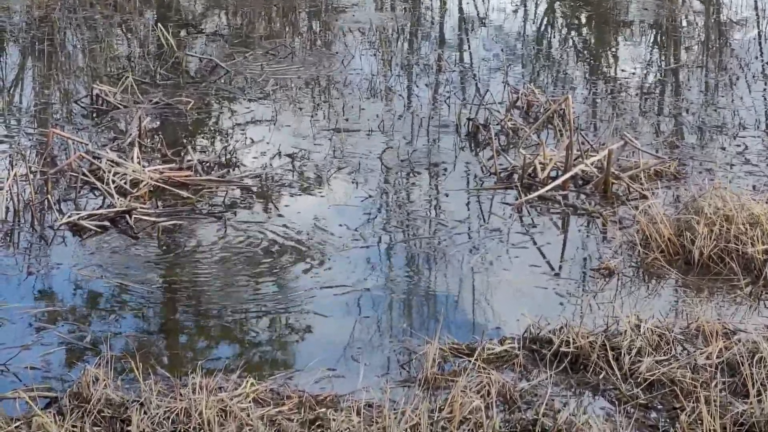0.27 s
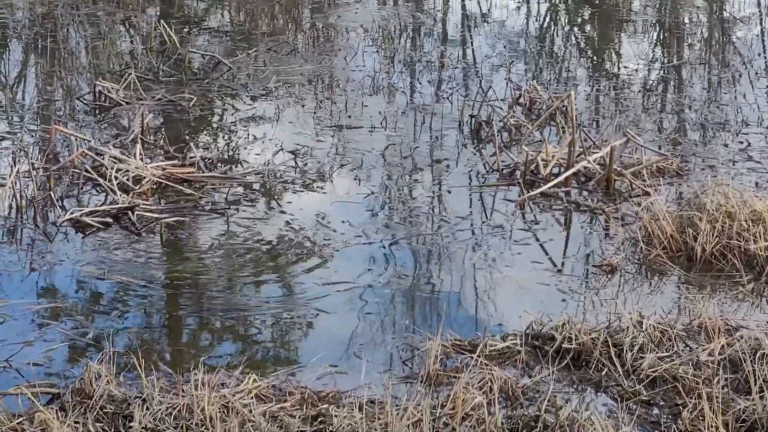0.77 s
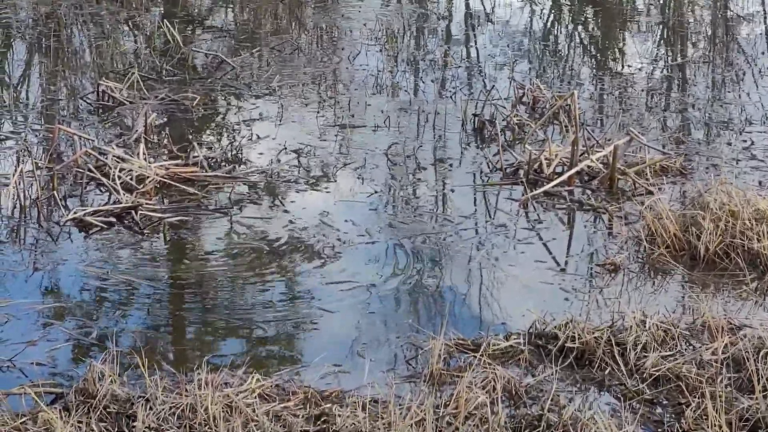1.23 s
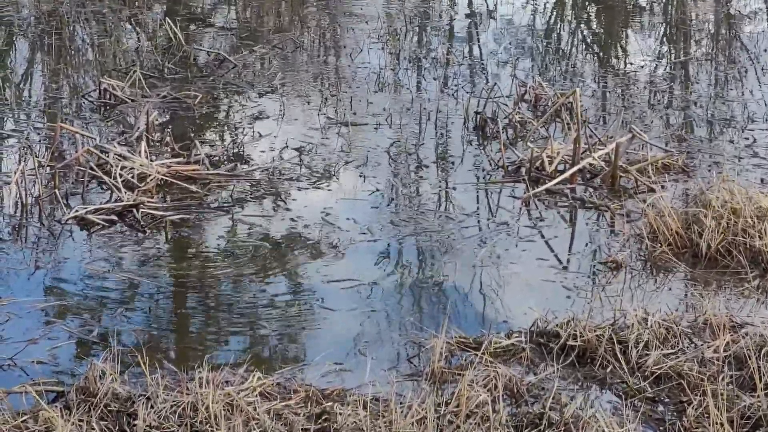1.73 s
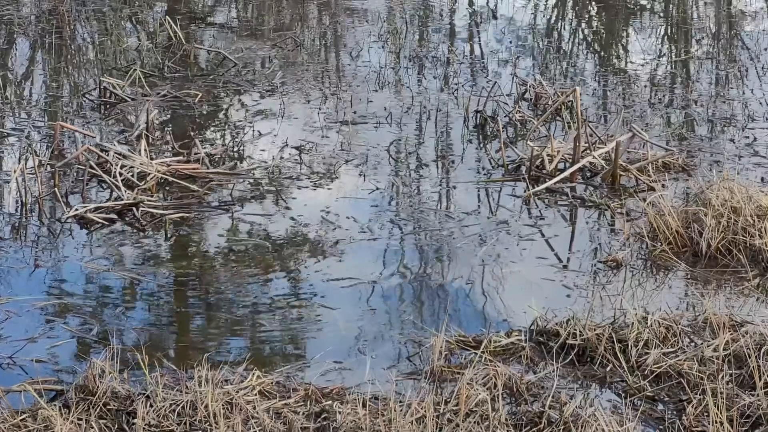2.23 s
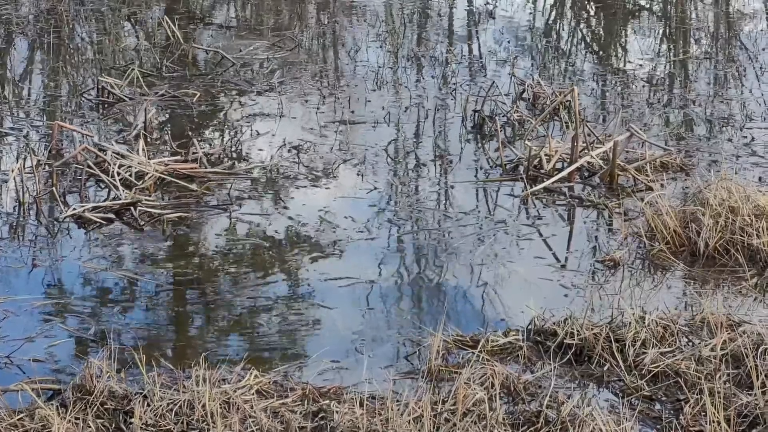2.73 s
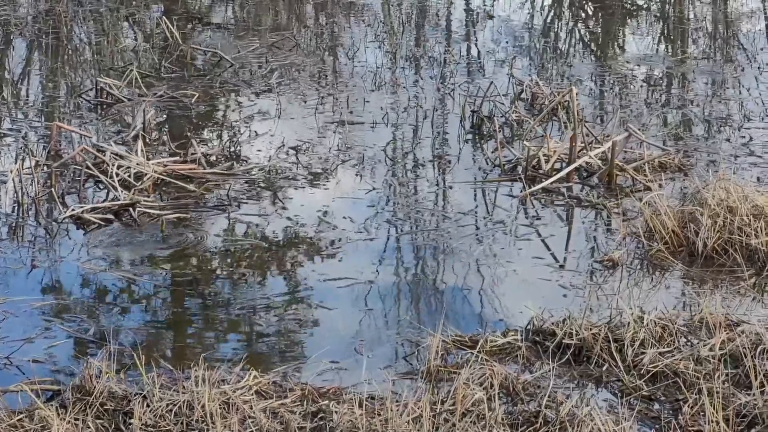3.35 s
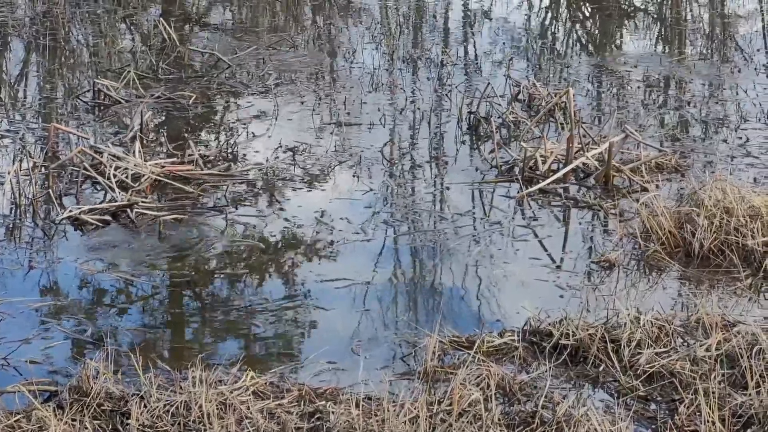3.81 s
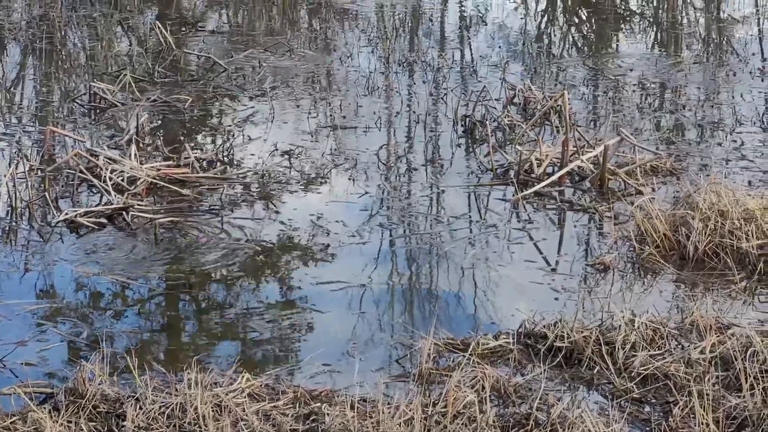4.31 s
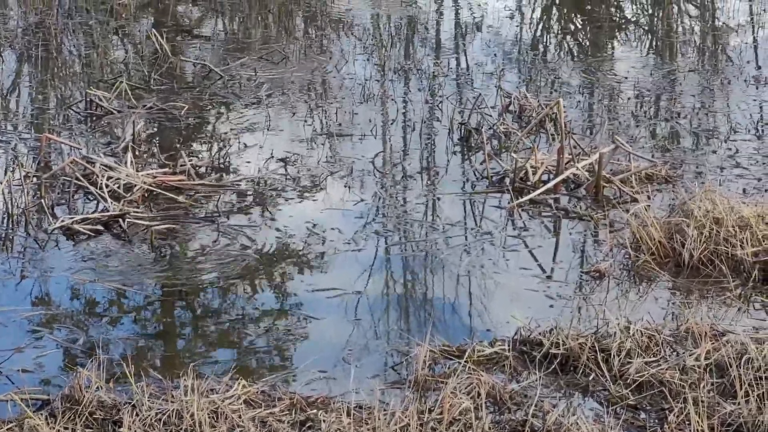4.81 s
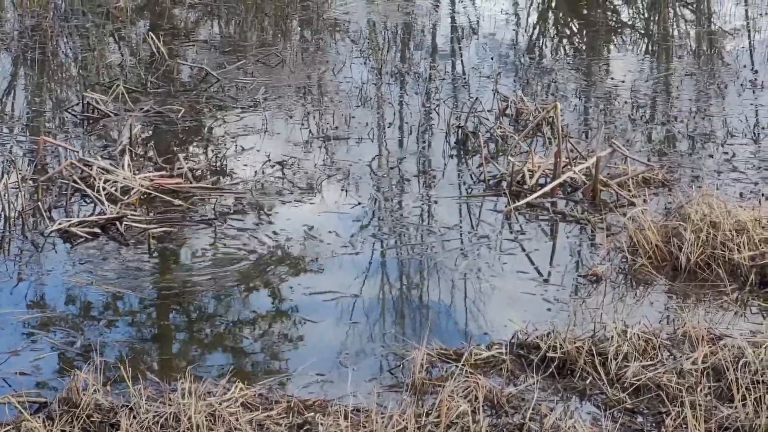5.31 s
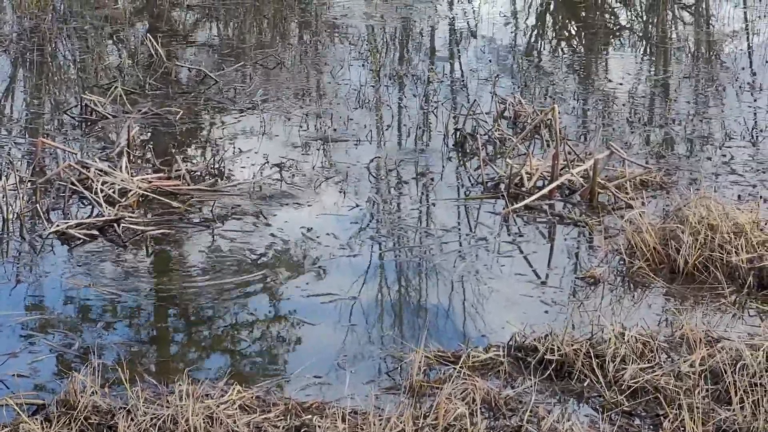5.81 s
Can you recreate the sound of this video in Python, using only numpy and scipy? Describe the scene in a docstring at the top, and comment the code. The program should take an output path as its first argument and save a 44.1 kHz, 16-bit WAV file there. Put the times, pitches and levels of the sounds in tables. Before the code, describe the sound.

About six seconds of a frog chorus on a woodland pond, heard in stereo from the bank. From the start, near frogs cluck in short, hollow, throaty bursts around 1.5 kHz, each a few hundredths of a second long, singly or in quick twos and threes that step up in pitch and usually loudness. Many farther frogs blend into a continuous blurred chatter. A distant engine hums near 215 Hz over low rumble, wavering, strongest around 0.6 to 0.9 s, and sinking slightly in pitch by 4 s. Clucks come irregularly through 3 s, then crowd together and grow louder from 3.1 to 4.2 s, with the far chorus swelling near 3.8 s. Near calls almost stop from about 4.5 to 4.85 s. A faint dry, ticking rustle, slightly left, rises between 4 and 5 s. Clucking then resumes busily to the end, with faint stirring air and soft echo from the trees.

```python
"""Frogs cluck in chorus on a woodland pond, heard from the bank by a camera with two microphone ports.
Each cluck is a short burst of throat pulses that rings the vocal sac, body and throat.
Many more frogs chatter farther out, made of overlapping clucks blurred together with noise.
A distant engine, built from sine waves, hums over a low noise rumble, with faint stirring air.
Something dry rustles faintly near the camera: hissing noise with tiny ticks in it."""
import sys
import numpy as np
from scipy import signal
from scipy.fft import rfft, irfft, next_fast_len
from scipy.io import wavfile
from scipy.ndimage import map_coordinates

SR = 44100
rng = np.random.default_rng(int(sys.argv[2]) if len(sys.argv) > 2 else 0)


def pcm_store(signal):
    """Save signal as 16-bit PCM."""
    levels = np.round(np.clip(np.atleast_2d(signal), -1, 1) * 32767)
    wavfile.write(sys.argv[1], SR, levels.astype(np.int16).T)


N = 267687  # length in samples

# Average sizes of the throat pulses in one cluck; three weak, slow ones run up to it.
# Each entry: size in dB.
PULSES = [-21, -16, -9, -2.5, -.5, 0, -.5, -2, -4.5, -9]


def amp(db):
    """Turn decibels into a gain."""
    return 10 ** (np.asarray(db) / 20)


def unit(x):
    """Scale a sound to rms 1."""
    return x / np.sqrt(np.mean(x ** 2) + 1e-20)


def along(points, hz):
    """Read a curve of (Hz, value) points on a log frequency axis."""
    f, v = np.transpose(points)
    return np.interp(np.log(hz + 1), np.log(f + 1), v)


def curves(rows):
    """Draw each column after the time as a curve with one value per sample."""
    s, *columns = np.transpose(rows)
    t = np.arange(N) / SR
    return [np.interp(t, s, column) for column in columns]


def wobble(rate):
    """Draw a smooth random curve with rate random points a second."""
    knots = rng.standard_normal(int(N * rate / SR) + 4)
    return map_coordinates(knots, [np.arange(N) * rate / SR])


def filtered(x, response):
    """Filter x with a response that is a function of frequency."""
    size = next_fast_len(N + SR // 2)
    f = np.fft.rfftfreq(size, 1 / SR)
    return irfft(rfft(x, size) * response(f), size)[..., :N]


def coloured(x, spectrum):
    """Shape x with a curve of (Hz, dB) points, then scale it to rms 1."""
    return unit(filtered(x, lambda f: amp(along(spectrum, f))))


def noise(alike):
    """Make white noise for two ports; alike is the share of power they have in common."""
    share = np.clip(alike, 0, 1)
    common = np.sqrt(share) * rng.standard_normal(N)
    return common + np.sqrt(1 - share) * rng.standard_normal((2, N))


def resonance(f, hz, width_hz):
    """Frequency response of one damped mode, something that rings at hz and dies away."""
    return 1j * f * width_hz / (hz * hz - f * f + 1j * f * width_hz)


def band(f, low_hz, high_hz, order):
    """Frequency response of a causal band filter with steep sides."""
    return signal.freqs(*signal.butter(order, [low_hz, high_hz], "band", analog=True), f)[1]


def tail(t60, size):
    """Scattered sound of energy 1 at each port: noise that loses 60 dB in t60 seconds."""
    t = np.arange(size) / SR
    soft_start = 1 - np.exp(-t / 0.0055)
    x = rng.standard_normal((2, size)) * amp(-60 * t / t60) * soft_start
    return x / np.linalg.norm(x, axis=1, keepdims=True)


def add(track, s, sound):
    """Mix a sound into the track at s seconds, cutting off what lies outside."""
    start = round(s * SR)
    part = sound[:, max(0, -start):max(0, N - start)]
    first = max(0, start)
    track[:, first:first + part.shape[1]] += part


def breeze():
    """Air stirs at each port on its own: separate low noises with a wandering level."""
    spectrum = [(18, -16), (30, -3), (40, -8), (60, -6), (120, -18), (250, -44), (600, -94.5)]  # (Hz, dB)
    stir = coloured(noise(alike=0), spectrum)
    return amp(-63 + 3 * wobble(3)) * stir


def engine():
    """A distant engine's orders (multiples of shaft rate) waver in the air over a broad rumble."""
    # Engine speed. Each row: time in seconds, pitch of the strong sixth order in Hz.
    engine_pitch = [(0.0, 218.8), (2.13, 218.6), (2.18, 217.8), (4.11, 214.9), (6.07, 214.7)]
    # The hum swells and fades on its way through the air.
    # Each row: time in seconds, level in dB before the gains below.
    hum_levels = [(0.03, -48), (0.45, -47), (0.56, -42), (0.93, -44), (1.15, -53), (1.4, -47), (1.52, -53),
                  (2.14, -49), (2.81, -52), (2.94, -58), (3.18, -51), (3.78, -57), (3.96, -46), (4.11, -46),
                  (4.53, -55), (4.87, -50), (5.65, -55), (6.04, -49)]
    # Weaker orders. Each row: multiple of the shaft rate, level in dB against the sixth order's average.
    overtones = [(2, -11), (3, -15), (7, -20.5), (8, -24), (9, -15), (12, -18)]
    # Loudness of the rumble. Each row: time in seconds, level in dB before the gains below.
    rumble_levels = [(0, -47), (.3, -50), (.4, -46.5), (.84, -44.5), (.95, -49), (1.6, -50.5), (2.05, -47),
                     (2.7, -48), (2.87, -53), (3.1, -47.5), (3.55, -50), (4, -46), (4.35, -49.5),
                     (5.05, -48.5), (5.55, -52), (6.07, -48)]
    # Tone of the rumble. Each row: frequency in Hz, relative strength in dB per Hz.
    rumble_spectrum = [(20, -29), (32, -17), (45, 1.5), (75, 0.5), (110, 0), (150, -5), (190, -11.5),
                       (245, -3.5), (290, -8.5), (360, -29), (500, -16), (900, -62)]

    (hz,), (db,), (rumble_db,) = curves(engine_pitch), curves(hum_levels), curves(rumble_levels)
    phase = 2 * np.pi * np.cumsum(hz) / SR
    shaft = phase / 6
    hum = amp(db + 0.3 * wobble(9)) * np.sin(phase)
    for multiple, level_db in overtones:
        loudness = amp(np.mean(db) + level_db + 0.67 * wobble(1.6))
        hum = hum + loudness * np.sin(multiple * shaft + .5 * wobble(10))
    rumble = amp(rumble_db + .4 + .9 * wobble(10)) * coloured(noise(alike=0.84), rumble_spectrum)
    # slightly stronger on the left
    return (amp(2.9) * hum + rumble) * amp([[.35], [-.35]])


def rustle(ticks_db=-7):
    """A soft dry hiss with tiny random ticks in it, stronger on the left."""
    # Loudness of the rustle. Each row: time in seconds, level in dB before the gains below.
    rustle_levels = [(0.05, -90), (2.45, -88), (2.73, -78), (2.85, -88), (3.79, -88), (4.09, -75),
                     (4.14, -78), (4.34, -73), (4.52, -79), (4.72, -69), (4.81, -77), (4.97, -66),
                     (5.17, -86), (5.22, -78), (5.42, -86), (5.5, -79), (5.55, -86), (6.0, -86)]
    # Tone of the rustle. Each row: frequency in Hz, relative strength in dB per Hz.
    dry_spectrum = [(1500, -44), (3500, -7), (5000, -7.5), (7000, -3.5), (8400, 1), (9300, -2.5),
                    (11000, 2), (12500, -4), (15500, 0)]

    level_db, = curves(rustle_levels)
    # about 60 ticks a second
    ticks = (rng.random(N) < 60 / SR) * rng.laplace(size=(2, N))
    grain = unit(noise(alike=.12)) + amp(ticks_db) * unit(ticks)
    loudness = amp(level_db + 5 + .8 * wobble(14))
    return loudness * coloured(grain, dry_spectrum) * amp([[1.7], [-2.1]])


def burst(f, sac_hz, lead, pulse_hz=360, spread=0.12, jitter=0.05, size_spread_db=2.85):
    """Spectra of one cluck's pulses, a row each; their spacing is a whole number of sac cycles."""
    # places counted in pulse periods; the three early pulses are farther apart
    place = np.append([-5.5, -3.6, -1.8], np.arange(len(PULSES) - 3))
    rate_hz = pulse_hz * np.exp(spread * rng.standard_normal())
    period = np.round(sac_hz / rate_hz) / sac_hz
    times = lead + (place + jitter * rng.standard_normal(len(place))) * period
    sizes = amp(PULSES + size_spread_db * rng.standard_normal(len(place)))
    # a delay turns the phase in step with frequency
    return sizes[:, None] * np.exp(-2j * np.pi * f * times[:, None])


def far_frogs(count=240, size=4096, range_db=6):
    """Overlapping distant clucks, dulled and blurred into a steady chatter with noise in it."""
    # Loudness of the far chorus. Each row: time in seconds, level in dB before a small cut below.
    chorus_levels = [(0, -49), (.73, -47), (1.59, -49.5), (2.47, -48), (2.7, -49.5), (3.35, -46),
                     (3.77, -43.5), (4.05, -46.5), (4.65, -49), (5.11, -47.5), (6.07, -46)]
    # Tone of the far chorus. Each row: frequency in Hz, relative strength in dB per Hz.
    far_spectrum = [(250, -28.5), (400, -12.5), (520, -1.5), (620, 2), (800, 1), (1100, -2), (1500, -10.5),
                    (1800, -16), (2100, -30), (3100, -42.5), (4000, -45.5), (5100, -47.5), (6500, -57)]

    out, f = np.zeros((2, N)), np.fft.rfftfreq(size, 1 / SR)
    lead = .03  # room in seconds for the early pulses
    side = np.array([[1], [-1]])
    for when, pitch, place, loud in rng.random((count, 4)):
        # a sound from one side reaches that port sooner
        ports = np.exp(2j * np.pi * f * side * (place - .5) * 0.00025)
        pulses = burst(f, 1200 + 480 * pitch, lead).sum(axis=0)
        add(out, when * N / SR - lead, amp(range_db * loud) * irfft(pulses * ports))
    scattered = signal.fftconvolve(out, tail(t60=0.24, size=SR // 4), axes=1)[:, :N]
    blurred = out + amp(-2) * scattered
    level_db, = curves(chorus_levels)
    chatter = coloured(blurred, far_spectrum)
    haze = coloured(noise(alike=0.76), far_spectrum)
    return amp(level_db - .7) * unit(chatter + amp(-4.5) * haze)


def woods(x):
    """Trunks around the pond return a faint echo, made by smearing x over a dying noise tail."""
    echo = signal.fftconvolve(x, tail(t60=0.2, size=SR), axes=1)[:, :N]
    gains = [(700, -33), (1500, -17.5), (3000, -21), (5500, -6.5)]  # (Hz, dB)
    return filtered(echo, lambda f: amp(along(gains, f)))


def clucks():
    """Each call steps to its last, highest cluck: (s, frog, level dB, sac Hz, throat dB)."""
    # Calls of one to three clucks. Each row: start in seconds, frog name, number of clucks,
    # spacing in seconds, swell per cluck in dB, level of the last cluck in dB,
    # sac pitch of the last cluck in Hz, throat level in dB against the sac.
    croaks = [(.086, "dull", 2, .056, 11, -37, 1470, -24), (.21, "dull", 2, .054, 7.5, -39.5, 1300, -22.5),
              (.322, "close", 2, .051, 8.5, -37.5, 1540, -26), (.395, "close", 1, 0, 0, -33, 1530, -26),
              (.432, "soft", 1, 0, 0, -33, 1470, -26), (.457, "dull", 1, 0, 0, -37.5, 1490, -20),
              (.657, "close", 2, .052, 4, -32, 1430, -25), (.786, "deep", 2, .058, 13, -33, 1460, -29),
              (.916, "muffled", 1, 0, 0, -35, 1510, -28), (1.056, "close", 2, .058, 7.5, -34, 1390, -23.5),
              (1.091, "close", 1, 0, 0, -41, 1560, -23), (1.279, "muffled", 3, .056, 2.5, -34, 1490, -29),
              (1.641, "left", 2, .055, 6, -32.5, 1640, -25.5),
              (1.761, "shrill", 2, .054, 5.5, -42.5, 1660, -17), (1.871, "deep", 1, 0, 0, -42.5, 1510, -25),
              (1.907, "deep", 2, .05, 3, -33, 1760, -25.5), (2.043, "left", 2, .059, 8.5, -36, 1190, -32),
              (2.215, "dull", 2, .053, .5, -41.5, 1650, -26), (2.339, "soft", 3, .057, 6, -31, 1500, -29),
              (2.718, "left", 2, .049, 6, -33.5, 1380, -27), (2.788, "close", 1, 0, 0, -37, 1400, -23),
              (2.85, "deep", 2, .035, 6, -41.5, 1500, -22), (2.91, "soft", 1, 0, 0, -39, 1350, -27),
              (2.946, "shrill", 1, 0, 0, -41, 1570, -17), (3.014, "left", 2, .049, 2.5, -34, 1370, -26.5),
              (3.1, "deep", 2, .062, 13, -31, 1690, -26), (3.202, "deep", 2, .058, 5.5, -29, 1590, -25.5),
              (3.285, "hoarse", 1, 0, 0, -40, 1600, -17), (3.321, "hoarse", 1, 0, 0, -31, 1370, -21),
              (3.378, "left", 1, 0, 0, -32.5, 1350, -25), (3.426, "shrill", 1, 0, 0, -43, 1500, -18),
              (3.5, "soft", 2, .017, -1, -37, 1470, -20), (3.557, "hoarse", 2, .048, 1, -30.5, 1500, -22.5),
              (3.624, "hoarse", 1, 0, 0, -29.5, 1500, -26), (3.652, "left", 2, .054, 2.5, -33, 1360, -24.5),
              (3.746, "right", 2, .052, 8, -27, 1500, -27), (3.858, "soft", 2, .047, 0, -35.5, 1500, -20),
              (3.88, "left", 1, 0, 0, -34, 1340, -23), (3.972, "left", 2, .051, 3, -31.5, 1460, -26),
              (4.086, "left", 1, 0, 0, -35.5, 1410, -30), (4.135, "right", 2, .045, 1, -29.5, 1560, -25),
              (4.278, "left", 2, .059, 6.5, -33, 1470, -23.5),
              (4.369, "left", 2, .059, 3, -35.5, 1450, -27),
              (4.882, "shrill", 2, .061, 7.5, -31.5, 1620, -24.5),
              (4.987, "hoarse", 1, 0, 0, -35.5, 1560, -23), (5.037, "right", 2, .045, 12.5, -33, 1330, -23),
              (5.104, "right", 1, 0, 0, -37, 1480, -24), (5.15, "bright", 2, .051, 4.5, -32, 1590, -27),
              (5.284, "right", 2, .063, 10, -33, 1310, -22),
              (5.418, "bright", 2, .055, 5.5, -33, 1450, -24),
              (5.442, "bright", 2, .054, 4, -32.5, 1670, -22), (5.604, "soft", 2, .056, 11, -38, 1480, -16),
              (5.639, "left", 1, 0, 0, -37.5, 1430, -22), (5.731, "bright", 2, .045, 8, -33, 1750, -24.5),
              (5.819, "bright", 1, 0, 0, -29, 1500, -22), (5.886, "soft", 1, 0, 0, -34, 1550, -26),
              (5.945, "shrill", 1, 0, 0, -34.5, 1490, -20), (5.972, "right", 1, 0, 0, -40, 1650, -18),
              (6.056, "hoarse", 1, 0, 0, -39.5, 1410, -24)]
    sac_rise = .035  # the sac's pitch climbs by about this share from cluck to cluck

    for start, frog, count, spacing, swell_db, db, sac_hz, throat_db in croaks:
        for k in range(count):
            to_go = count - 1 - k
            level_db = db - swell_db * to_go
            yield start + k * spacing, frog, level_db, sac_hz * (1 - sac_rise) ** to_go, throat_db


def near_frogs(size=8192, sag=0.028, stems_db=-3, dulling_db=1.3):
    """Pulses ring the sac, the body and two throat modes; reeds and water scatter each cluck."""
    # Voice and place of each near frog. Each row, under the frog's name: throat resonance in Hz,
    # top resonance in Hz, top level in dB against the sac, left minus right in dB,
    # head start of the left port in seconds.
    frogs = {"close": (2930, 5170, -29.5, 1.8, .00004), "bright": (2980, 5400, -28.5, 1.8, .00001),
             "deep": (3000, 4820, -33, 1.3, .00001), "shrill": (3130, 5780, -34.5, 2, .00005),
             "hoarse": (2830, 5220, -34.5, .3, .00009), "soft": (2920, 5140, -41, .5, .00006),
             "dull": (2780, 5200, -47, .3, .00035), "muffled": (2680, 5050, -52, 3, .00018),
             "left": (2700, 5150, -37.5, 0, .00032), "right": (2820, 4950, -37.5, 1.3, -.00045)}
    full_db = -32  # level of a full cluck
    # level in a full cluck, then dB gained for each dB that a cluck is weaker
    body_db, body_slope = -8.8, .42  # body against sac
    scatter_db, scatter_slope = -7, .33  # scattered against direct sound

    out, f = np.zeros((2, N)), np.fft.rfftfreq(size, 1 / SR)
    lead = .03  # room in seconds for the early pulses
    length = .028  # seconds over which a cluck's level is reckoned
    side = np.array([[.5], [-.5]])
    sac_band = band(f, low_hz=877, high_hz=1956, order=6)
    body_band = band(f, low_hz=534, high_hz=1068, order=4)
    throat_band = band(f, low_hz=2320, high_hz=3680, order=4)
    top_band = band(f, low_hz=3900, high_hz=6400, order=5)
    # the sac swells during a cluck, so its resonance sinks from pulse to pulse
    sinking = 1 + sag * np.linspace(.5, -.5, len(PULSES))[:, None]
    for s, frog, db, sac_hz, throat_db in clucks():
        throat_hz, top_hz, top_db, pan_db, ahead = frogs[frog]
        weaker_db = full_db - db
        direct = amp(side * pan_db) * np.exp(2j * np.pi * f * side * ahead)
        # weaker frogs sit farther off, so more of their sound is scattered
        scatter = amp(scatter_db + scatter_slope * weaker_db)
        path = direct + scatter * rfft(tail(t60=.08, size=size))
        # short waves bounce about longer among the stems
        high_path = path + amp(stems_db) * rfft(tail(t60=.09, size=size))

        pulses = burst(f, sac_hz, lead)
        train = pulses.sum(axis=0)
        # the first pulses are the brightest
        bright = amp(-dulling_db * np.arange(len(PULSES))) @ pulses

        sac = (pulses * resonance(f, sac_hz * sinking, width_hz=190)).sum(axis=0) * sac_band
        body = train * body_band * resonance(f, 0.52 * sac_hz, width_hz=490)
        throat = train * throat_band * resonance(f, throat_hz, width_hz=500)
        top = bright * top_band * resonance(f, top_hz, width_hz=700) ** 2
        modes = [(0, sac * path),
                 (body_db + body_slope * weaker_db, body * path),
                 (throat_db, throat * high_path),
                 (top_db, top * high_path)]
        cluck = sum(amp(level_db) * unit(irfft(mode)) for level_db, mode in modes)
        add(out, s - lead, amp(db) * np.sqrt(length * SR / size) * cluck)
    return out


def scene():
    """The pond as heard from the bank: every source added together."""
    frogs = near_frogs()
    return frogs + woods(frogs) + far_frogs() + engine() + breeze() + rustle()


def record(dry):
    """The camera keeps nothing above its band limit: a sharp cut in the spectrum."""
    top_hz = 15780  # band limit in Hz
    return filtered(dry, lambda f: f < top_hz)


dry = scene()
out = record(dry)
pcm_store(out)
```